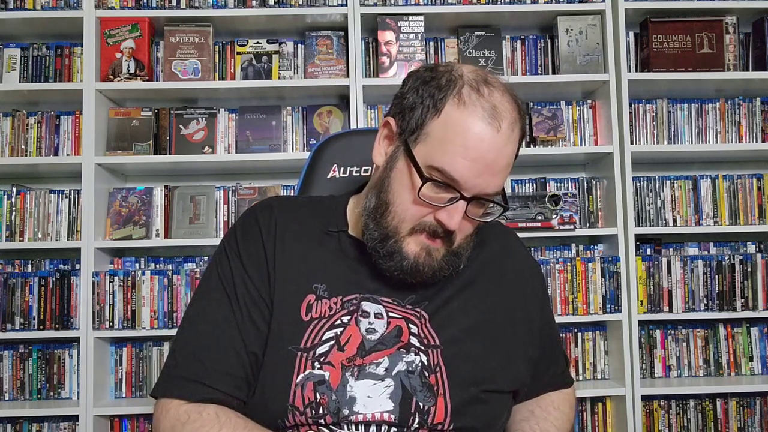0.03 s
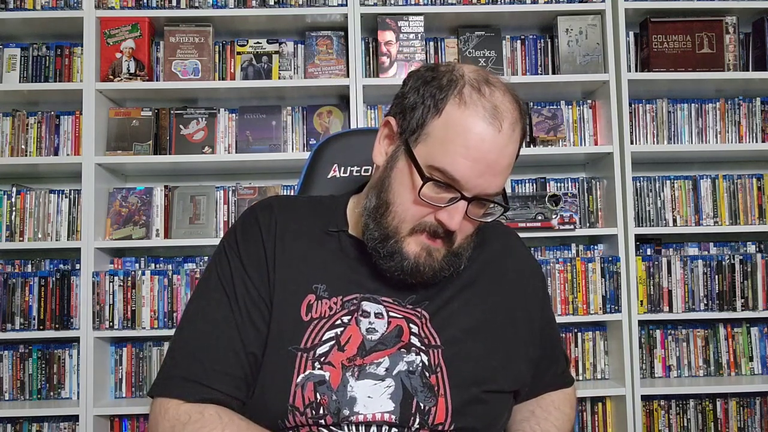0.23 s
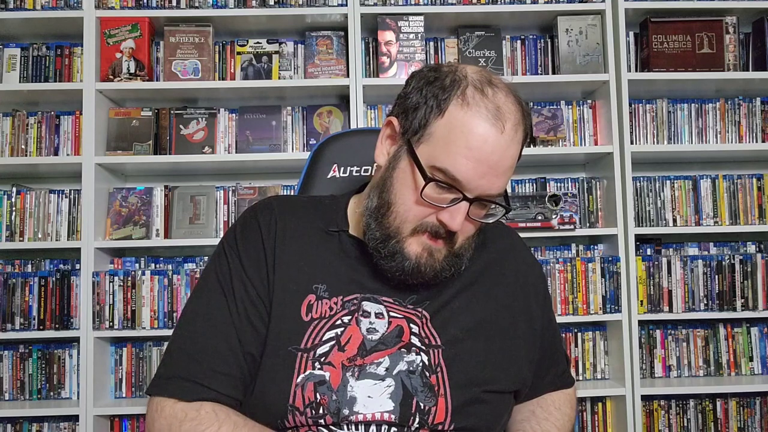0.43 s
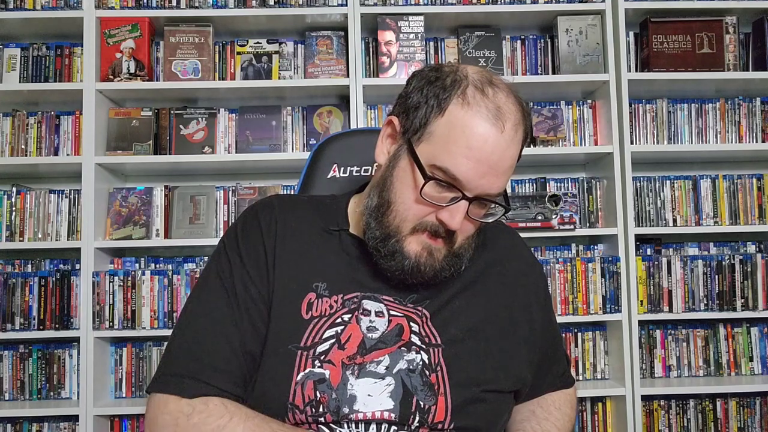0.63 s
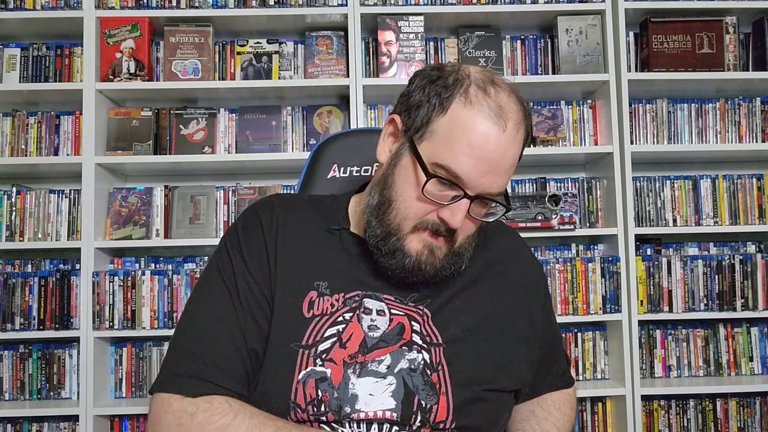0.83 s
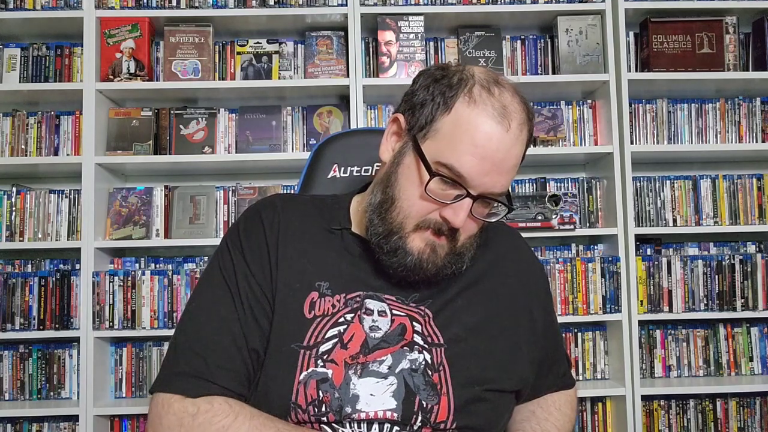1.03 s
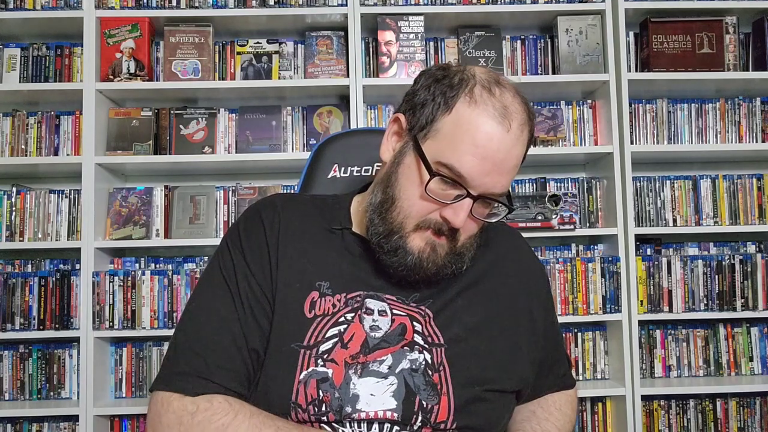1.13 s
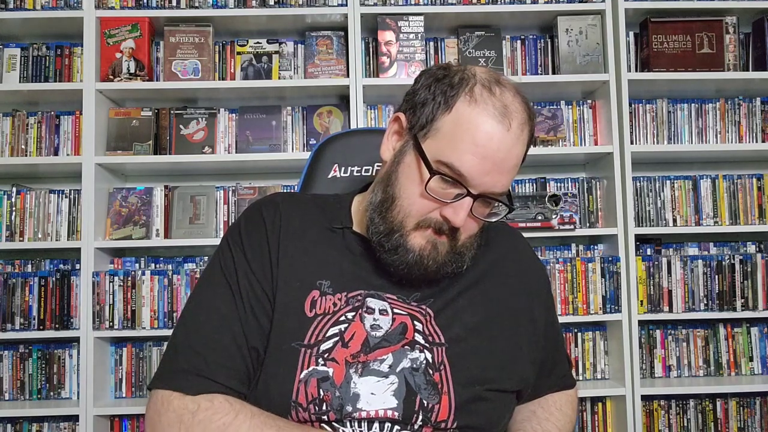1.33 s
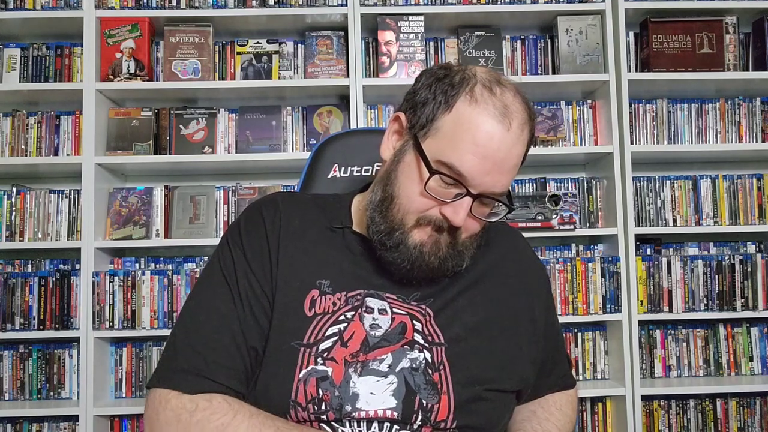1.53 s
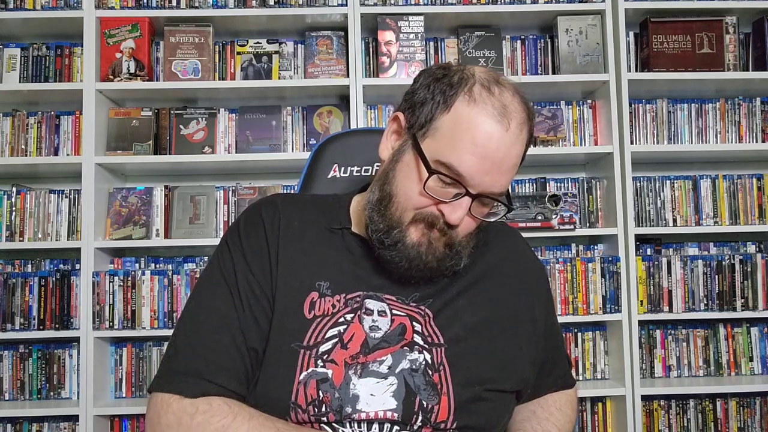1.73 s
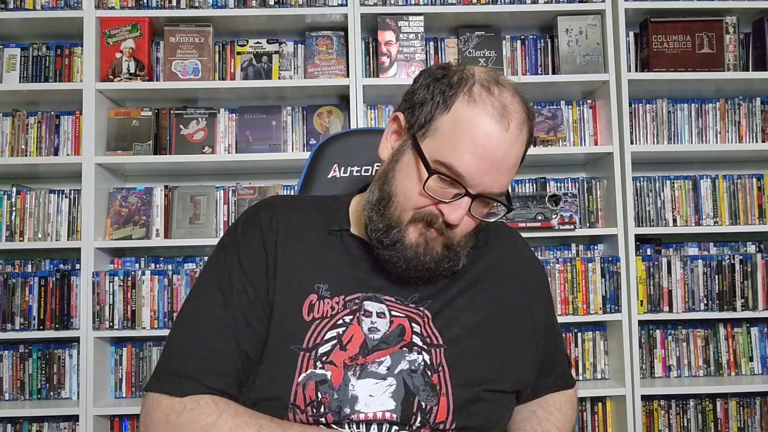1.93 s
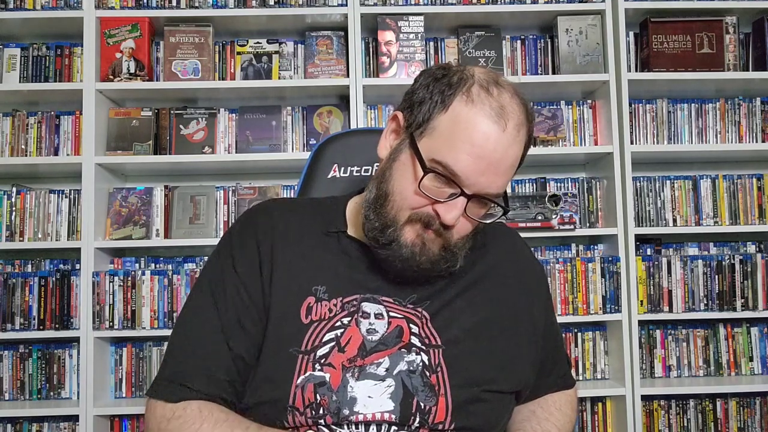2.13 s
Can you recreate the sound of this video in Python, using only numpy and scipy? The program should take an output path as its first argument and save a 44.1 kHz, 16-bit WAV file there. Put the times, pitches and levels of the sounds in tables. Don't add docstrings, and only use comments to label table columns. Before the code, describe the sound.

A plastic disc case is opened close to the microphone in a small furnished room: a small tick, a loud bright snap with quick rattle, then lid knocks, soft rubs and faint taps over low hum.

```python
import sys
import numpy as np
from scipy import signal
from scipy.fft import rfft, irfft, next_fast_len
from scipy.io import wavfile
from scipy.ndimage import map_coordinates

SR = 44100
rng = np.random.default_rng(int(sys.argv[2]) if len(sys.argv) > 2 else 0)


def to_linear_factor(level_db):
    exponent = np.asarray(level_db, float) / 20
    return 10 ** exponent


def materialize(psi):
    bounded = np.clip(np.atleast_2d(psi).T, -1, 1)
    quanta = np.round(bounded * 32767).astype(np.int16)
    wavfile.write(sys.argv[1], SR, quanta)


N = 97020
CONTACT_LEN = 4096
CONTACT_GRIT = 0.45

HUM_HZ = 58.6, 87.1
# level in dB, frequency drift in Hz, level swell in dB, phase in rad.
HUMS = [(-66, 0.05, 1.5, 1.6), (-62, 0.11, 1, 4.6)]
# frequency in Hz, level in dB.
HISS = [(100, -30), (170, -18), (320, -21), (1300, -29), (4400, -37), (7600, -43), (8600, -62),
        (16500, -72)]
# frequency in Hz, level in dB.
RUMBLE = [(15, -13), (35, -3), (70, 1.5), (115, -3.5), (150, -10), (220, -47)]
# frequency in Hz, 60 dB decay time in seconds.
ROOM_DECAY = [(200, .2), (1400, .17), (4000, .19), (12000, .19)]
# frequency in Hz, level in dB.
ROOM_TONE = [(200, 3.5), (6500, 1), (9000, -3), (16000, -8)]
# frequency in Hz, phase between the ports in rad.
PORT_LEAD = [(0, 0), (3200, 1.4), (5200, 1.9), (7900, 2.25), (9100, 3.1), (10200, 4.2), (16000, 5.3)]
# frequency in Hz, left over right in dB.
PORT_SHADOW = [(1000, -.3), (3000, -.5), (5500, 1.2), (7800, -1), (9100, -7), (11000, -3), (13000, 0)]
# time in seconds, level in dB.
HANDS = [(0, -76.5), (0.049, -82), (.15, -110), (1.08, -110), (1.2, -81), (1.35, -73), (1.45, -70),
         (1.6, -71), (1.9, -73), (2.2, -74)]
# frequency in Hz, level in dB.
SLEEVE = [(120, -25), (350, -5), (1500, -13), (4500, -12.5), (7600, -13), (9000, -20), (13000, -21),
          (16000, -25)]
# frequency in Hz, level in dB per Hz.
EDGE = [(1180, -24), (2000, -2.5), (2630, -9.5), (5240, -6), (11800, -11.5), (15800, -23.5), (16500, -43)]
# frequency in Hz, width in Hz, level in dB.
SHELL_MODES = [(233, 58, -9), (417, 100, -4.5), (536, 41, -3), (680, 51, -4), (1020, 43, -7.5),
               (1400, 250, -5), (1750, 120, -5.5), (2330, 300, -24.5)]
# frequency in Hz, width in Hz, level in dB.
LID_MODES = [(250, 40, -18), (505, 61, -4), (682, 130, -3), (795, 40, -5), (1104, 150, -8)]
# frequency in Hz, width in Hz, level in dB.
TAB_MODES = [(1100, 40, -9.5), (1400, 150, -4), (1670, 120, -11), (2740, 120, -5.5), (3620, 120, -7),
             (4780, 230, 2.5), (7400, 900, -4), (11200, 1200, -8), (15100, 820, -12)]
# frequency in Hz, width in Hz, level in dB.
CLASP_MODES = [(1350, 160, -11.5), (2200, 200, -12), (2590, 74, -6), (3255, 93, 6.5), (4215, 330, 2),
               (5250, 270, -2.5), (5950, 460, -2), (8000, 2000, -10), (11540, 1000, -8.5),
               (15400, 690, -20)]
# frequency ratio, level in dB.
OVERTONES = [(1, 1), (1.599, -3), (2.098, -5)]
# start in seconds, rise in seconds, 60 dB fall in seconds, edge dB, shell dB.
RUBS = [(0.049, 0.029, 0.17, -51.5, -58), (0.17, 0.042, 0.03425, -37, -53.5),
        (0.349, 0.013, 0.069, -67, -53), (1.718, 0.0067, 0.2079, -59, -68),
        (0.374, 0.021, 0.12, -43, -44.5), (0.419, 0.025, 0.08, -84, -46.5), (0.463, 0.016, 0.16, -76, -57),
        (0.78, 0.0086, 0.089, -60, -54.5), (1.082, 0.0115, 0.099, -52, -45),
        (1.141, 0.039, 0.19, -70, -74.5), (1.401, 0.02, 0.054, -60.5, -63.5),
        (1.529, 0.026, 0.24, -87, -62), (2.11, 0.034, 0.25, -93, -65.5)]
# start in seconds, end in seconds, frequency in Hz, width in Hz, level in dB.
BUZZES = [
    (1.487, 1.61, 3300, 130, -73),
    (1.11, 1.205, 2170, 130, -74),
    (1.2, 1.65, 7600, 300, -88),
    (.9, .925, 553, 40, -68),
]
# start in seconds, crack peak in dB, thud in dB, ring in Hz, ring level in dB.
KNOCKS = [(0.3679, -62.5, -47, 920, -50.5), (0.3765, -41, -46.5, 1190, -49), (.3835, -38, -53, 1460, -53.5),
          (0.3905, -32.5, -45, 1030, -48.5), (.3928, -24.5, -48, 1980, -50.5),
          (.399, -36, -47.5, 1100, -52), (0.4052, -32, -47, 756, -53.5), (.4095, -23.5, -53, 1400, -51),
          (.419, -47.5, -51.5, 1250, -56), (0.4748, -40, -82, 1760, -55), (0.7795, -39.5, -59, 974, -54.5),
          (.7805, -46, -70, 433, -57), (.79, -55, -74, 1700, -62), (.801, -45, -64, 996.1, -60.5),
          (1.0825, -28.5, -51, 1752, -44.5), (1.089, -50, -81, 238, -53.5), (1.0968, -30, -73, 964, -40.5),
          (1.1027, -24.5, -61.5, 1670, -48), (1.1035, -50, -79, 543, -47.5),
          (1.1065, -41.5, -65, 1500, -44.5), (1.1113, -39.5, -50, 910, -46.5),
          (1.109, -58.5, -61, 234, -61), (1.124, -50, -72, 535, -56)]
# start in seconds, crack
# peak in dB, thud in dB, ring in Hz, ring level in dB.
LIGHT_CONTACTS = [(0.6334, -48.5, -68, 1131, -74), (0.716, -82, -81, 1000, -66), (1.2261, -56, -67, 1116, -60),
                  (1.277, -54, -62, 1620, -62.5), (1.4094, -52, -85, 1035, -55.5), (1.4637, -45.5, -57, 1630, -57.5),
                  (1.49, -61, -63, 1570, -62), (1.5271, -43, -60.5, 1750, -51.5), (1.556, -41, -61.5, 1604, -57.5),
                  (1.9027, -48, -62, 910, -63.5), (1.9107, -51.5, -60, 2530, -62.5), (1.916, -69, -75, 920, -60),
                  (1.984, -58, -62.5, 1750, -61.5), (2.1188, -80, -70, 1990, -62.5),
                  (0.636, -72.5, -81, 1130, -67), (0.902, -80.5, -87, 545, -67), (0.782, -74, -71.5, 1028, -75),
         (0.4417, -72, -67, 885, -49.5), (.4465, -75, -82, 680, -41.5), (0.4541, -71, -74, 940, -55.5),
         (0.801, -61, -87, 423, -60.5), (1.492, -59, -86, 3261, -61), (1.525, -58, -69, 3770, -67),
         (1.529, -80, -91, 3250, -57), (1.543, -85, -96, 3310, -67), (1.588, -80, -88, 3280, -76),
         (.232, -60, -69, 250, -49.5), (1.558, -67, -92, 3200, -55.5), (1.572, -80, -91.5, 3300, -70),
         (2.152, -71, -68, 1400, -68)]
# start in seconds, peak in dB, shell thud in dB.
TICKS = [
    (.0727, -27.5, -62),
    (.0736, -14.5, -58),
    (.0745, -22.5, -58),
    (.0762, -26, -60.5),
    (.0825, -34.5, -63.5),
    (.087, -41, -64),
]
# start in seconds, peak in dB, lid thud in dB, chatter length in ms.
SNAPS = [
    (0.1998, -24, -41, 0.6),
    (0.2011, -5, -28, .5),
    (0.2021, -3, -33, .7),
    (.2031, -9, -33, .8),
    (.2056, -16, -38.5, 0.75),
    (.2095, -17, -22.5, 2.5),
    (.2220, -15, -33, 1.2),
    (0.2290, -14, -27.5, 1.2),
    (.2372, -22, -33, 2),
    (0.2452, -32, -45, 1),
]


def unit(x):
    return x / np.sqrt(np.mean(x ** 2) + 1e-20)


def peak(x, db):
    return to_linear_factor(db) * x / np.abs(x).max()


def along(points, hz):
    f, v = np.transpose(points)
    return np.interp(np.log(hz + 1), np.log(f + 1), v)


def filtered(x, response):
    m = next_fast_len(x.shape[-1] + 8192)
    spectrum = rfft(x, m) * response(np.fft.rfftfreq(m, 1 / SR))
    return irfft(spectrum, m)[..., :x.shape[-1]]


def wobble(rate):
    knots = rng.standard_normal(int(N / SR * 40) + 4)
    return map_coordinates(knots, [np.arange(N) * rate / SR], mode="mirror")


def body(modes, scatter_db):
    luck = rng.normal(0, 1, len(modes)) * scatter_db

    def response(f):
        total = 0
        for k, (center, width, db) in enumerate(modes):
            damping = 1j * f * width
            total = total + (-1) ** k * to_linear_factor(db + luck[k]) * damping / (center * center - f * f + damping)
        return total
    return response


def edge(f):
    return to_linear_factor(along([(0.86, -120)] + list(EDGE), f))


def chatter(ms, share):
    u = np.arange(CONTACT_LEN) / SR / (max(ms, 0.1) / 1000)
    grit = u * np.exp(-2 * u) * rng.standard_normal(CONTACT_LEN) * rng.exponential(1, CONTACT_LEN)
    grit = grit / np.linalg.norm(grit)
    click = np.arange(CONTACT_LEN) == np.argmax(u > 0.4)
    return click + share * grit, grit


def add(out, s, x):
    out[:, round(s * SR):][:, :x.shape[1]] += x


def port_noise(points):
    return unit(filtered(rng.standard_normal((2, N)), lambda f: to_linear_factor(along(points, f))))


def background():
    t = np.arange(N) / SR
    hum = 0
    for hz, (db, drift, swell, phase) in zip(HUM_HZ, HUMS):
        level = to_linear_factor(db + swell * wobble(9)) * np.sqrt(2)
        cycles = hz * t + np.cumsum(drift * wobble(6.5)) / SR
        hum = hum + level * np.sin(2 * np.pi * cycles + phase)
    u = np.arccos(0.8) / 2
    mix = np.array([[np.cos(u), np.sin(u)], [np.cos(u), -np.sin(u)]])
    hiss = to_linear_factor(-80 + 0.74 * wobble(11)) * port_noise(HISS)
    rumble = to_linear_factor(-66.5) * port_noise(RUMBLE)
    return hum * to_linear_factor([[0.4], [-0.4]]) + mix @ (hiss + rumble)


def room(x):
    gap_s, tail_db = 0.0035, -11
    hz, t, z = signal.stft(rng.standard_normal((2, SR // 3)), SR, nperseg=256)
    decay = along(ROOM_TONE, hz)[:, None] - 60 * t / along(ROOM_DECAY, hz)[:, None]
    tail = signal.istft(z * to_linear_factor(decay), SR, nperseg=256)[1]
    tail = tail * np.clip(np.arange(tail.shape[1]) / SR / gap_s, 0, 1) ** 2
    tail = tail + 0.53 * tail.mean(axis=0)
    tail = to_linear_factor(tail_db) * tail / np.linalg.norm(tail[0])
    tail[:, 0] = 1
    return signal.fftconvolve(x[None], tail, axes=1)


def hands():
    s, db = np.transpose(HANDS)
    patches = to_linear_factor(1.5 * wobble(35) + 2.5 * rng.standard_normal(N))
    rustle = unit(filtered(rng.standard_normal(N) * patches, lambda f: to_linear_factor(along(SLEEVE, f))))
    return to_linear_factor(np.interp(np.arange(N) / SR, s, db)) * rustle


def rubbing():
    grains_per_s, spread_db = 6600, 1
    slips = rng.standard_normal(N) * (rng.random(N) < grains_per_s / SR)
    slips = slips * to_linear_factor(spread_db * rng.exponential(1, N))
    bright = unit(filtered(slips, edge))
    dull = unit(filtered(slips, body(SHELL_MODES, 0)))
    t, out = np.arange(N) / SR, np.zeros(N)
    for s, rise, t60, edge_db, shell_db in RUBS:
        fall = to_linear_factor(-60 * np.clip(t - s - rise, 0, None) / t60)
        stroke = np.clip((t - s) / rise, 0, 1) ** 2 * fall
        out += stroke * (to_linear_factor(edge_db) * bright + to_linear_factor(shell_db) * dull)
    return out


def buzz():
    t, out = np.arange(N) / SR, np.zeros(N)
    for start, end, hz, width, db in BUZZES:
        slips = rng.standard_normal(N) * to_linear_factor(2.2 * wobble(39.2))
        ring = body([(hz, width, 0)], 0)
        fade = 0.3 * (end - start)
        gate = np.clip(np.minimum((t - start) / 0.004, (end - t) / fade), 0, 1)
        out += to_linear_factor(db) * gate * unit(filtered(slips, lambda f: ring(f) ** 2))
    return out


def contacts(rows, ms):
    ring_q, widest_hz = 6, 220
    for s, db, thud_db, hz, ring_db in rows:
        blow, grit = chatter(ms, CONTACT_GRIT)
        blow = blow + 0.9 * chatter(14, 0)[1]
        panel = [(hz * r, r * r * min(hz / ring_q, widest_hz), level) for r, level in OVERTONES]
        ring = body(panel, 1.226)
        crack = peak(filtered(grit, edge), db)
        thud = peak(filtered(blow, body(SHELL_MODES[:5], 2)), thud_db + 5)
        tone = peak(filtered(blow, lambda f: ring(f) ** 2), ring_db + 6)
        yield s, crack + thud + tone


def tab():
    for s, db, thud_db in TICKS:
        blow, grit = chatter(0.6, CONTACT_GRIT)
        ring = peak(filtered(blow, body(TAB_MODES, 2)), db)
        crack = peak(filtered(grit, edge), db - 3.5)
        thud = peak(filtered(blow, body(SHELL_MODES[1:5], 1)), thud_db + 11)
        yield s, ring + crack + thud


def clasp():
    detune, scatter_db = 0.008, 0.8
    for s, db, thud_db, ms in SNAPS:
        blow, grit = chatter(ms, 0.6)
        flexed = [(hz * (1 + detune * rng.normal()), width, level) for hz, width, level in CLASP_MODES]
        ring = peak(filtered(blow, body(flexed, scatter_db)), db)
        crack = peak(filtered(grit, edge), db - 8)
        thud = peak(filtered(blow, body(LID_MODES, scatter_db)), thud_db + 0.5)
        yield s, ring + crack + thud


def ports(f):
    low_cut_hz = 69
    turn = 0.5j * np.interp(f, *np.transpose(PORT_LEAD)) + np.log(to_linear_factor(along(PORT_SHADOW, f) / 2))
    return np.exp(turn * np.array([[1], [-1]])) * (1j * f / (low_cut_hz + 1j * f)) ** 2


def pan(db):
    return to_linear_factor([[db / 2], [-db / 2]])


def scene():
    near = np.zeros((2, N + SR))
    friction = rubbing() + hands() + buzz()
    touches = [*contacts(KNOCKS, 2.4), *contacts(LIGHT_CONTACTS, 3), *tab()]
    for s, hit in [(0, friction), *touches]:
        add(near, s, room(hit) * pan(2))
    for s, hit in clasp():
        add(near, s, room(hit) * pan(0.3))
    return filtered(near[:, :N], ports) + background()


def top_cut(x):
    return signal.sosfilt(signal.butter(12, 16820, fs=SR, output="sos"), x)


def record(dry):
    soft = dry / (1 + np.abs(dry / 1.1) ** 4) ** (1 / 4)
    finished = filtered(soft, lambda f: f < 16100)
    return top_cut(finished)


dry = scene()
out = record(dry)
materialize(out)
```